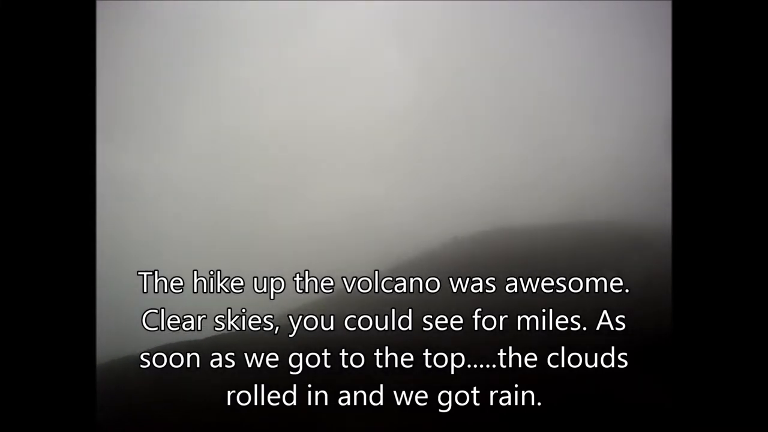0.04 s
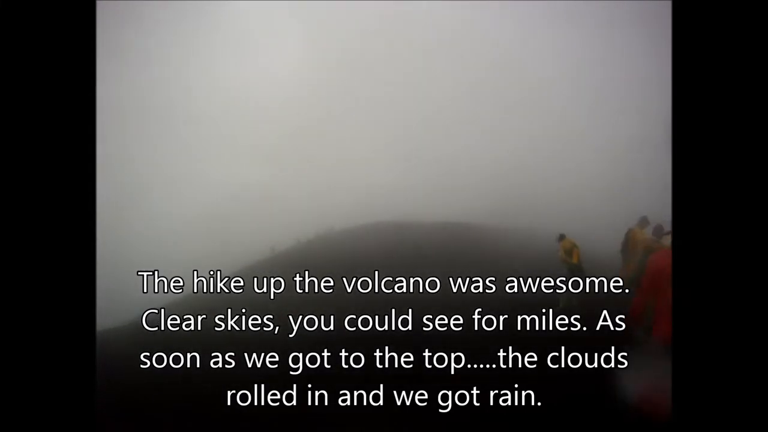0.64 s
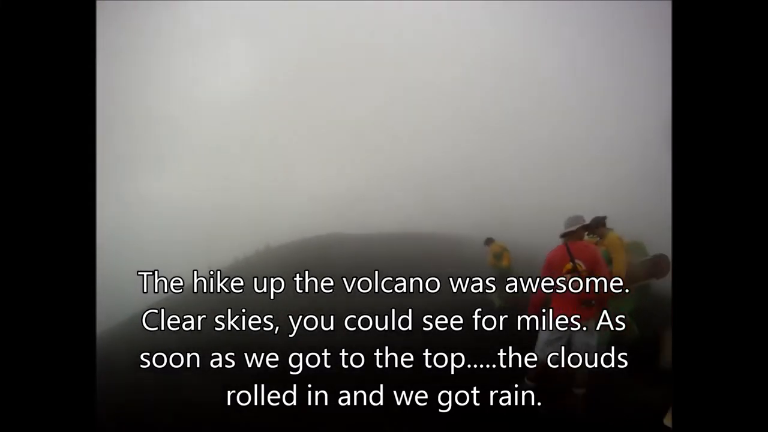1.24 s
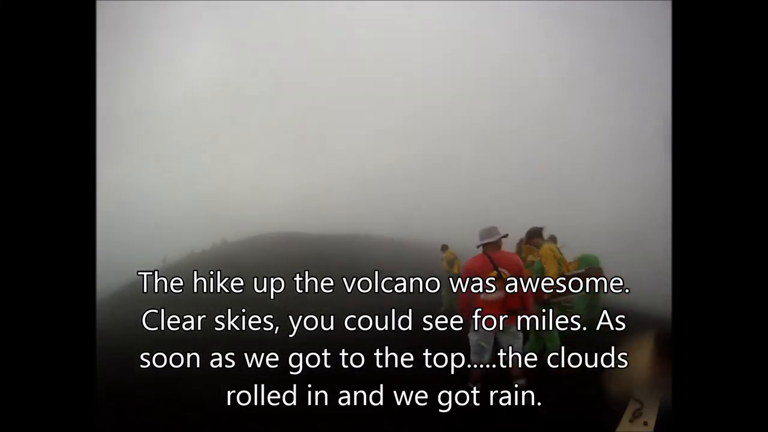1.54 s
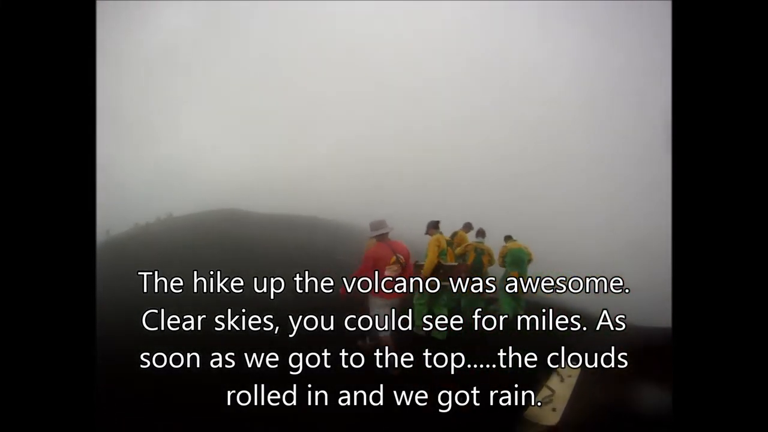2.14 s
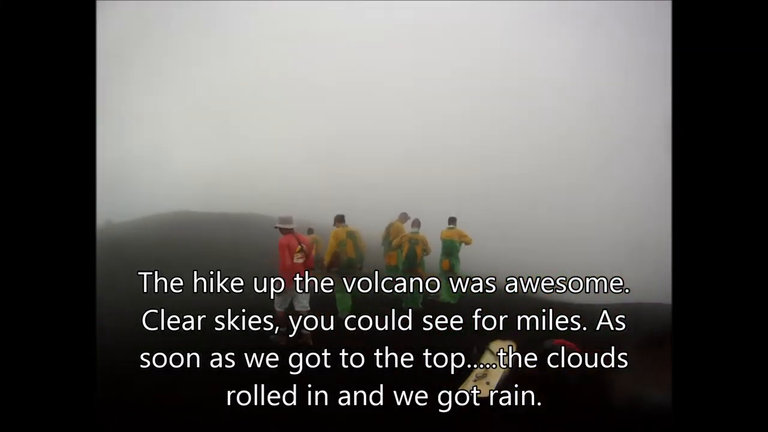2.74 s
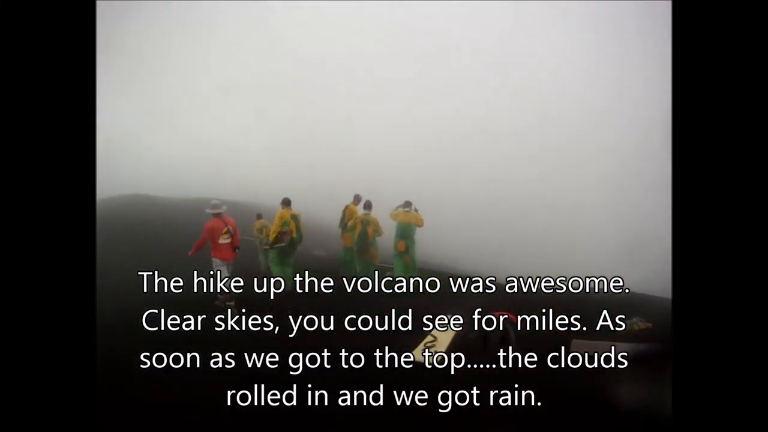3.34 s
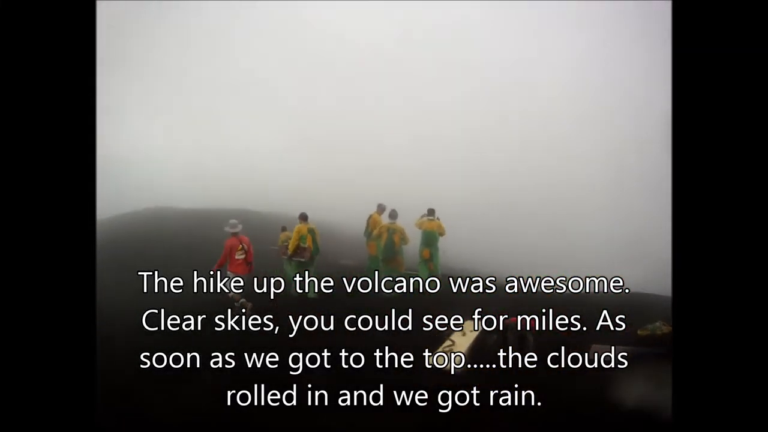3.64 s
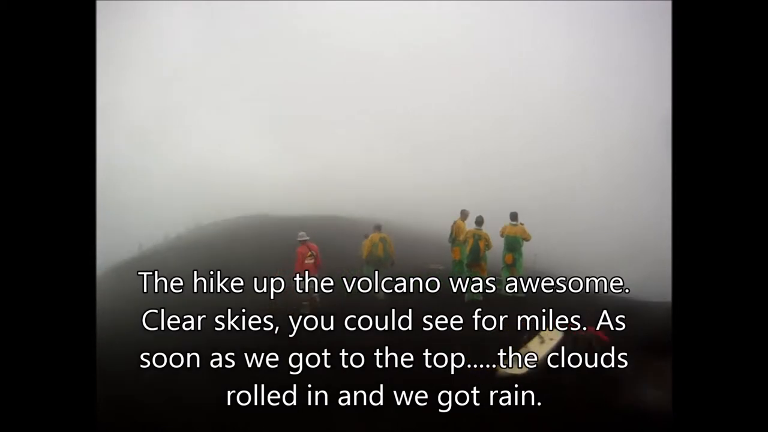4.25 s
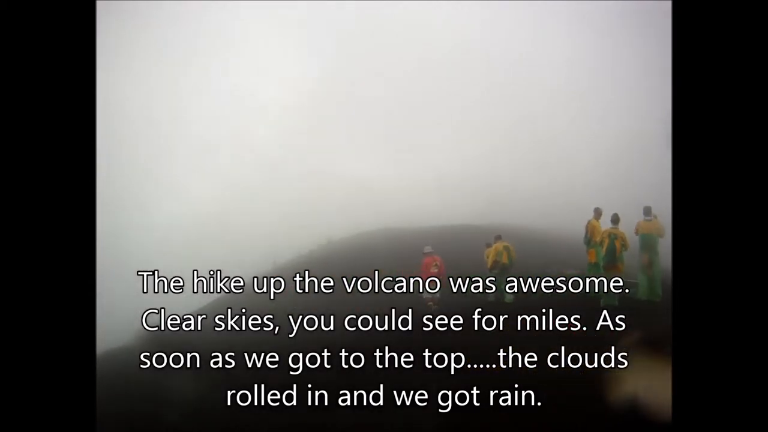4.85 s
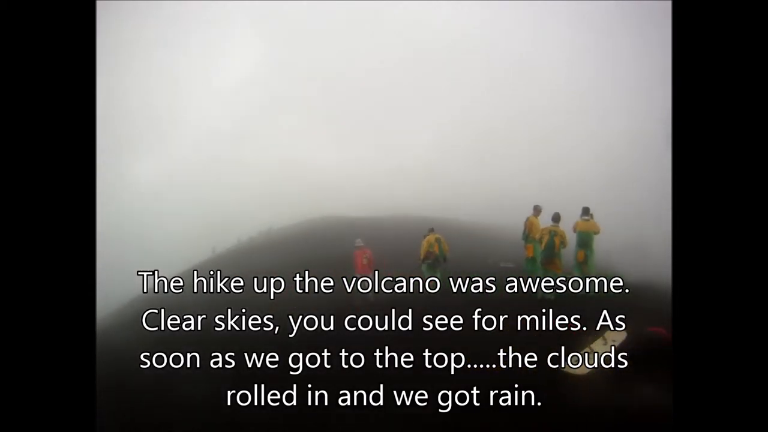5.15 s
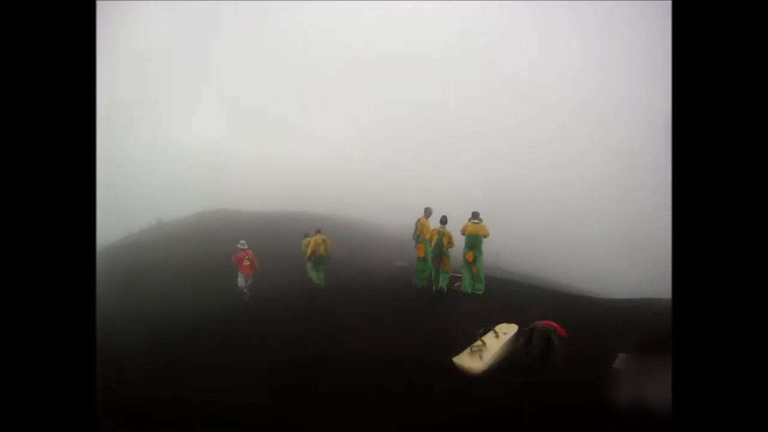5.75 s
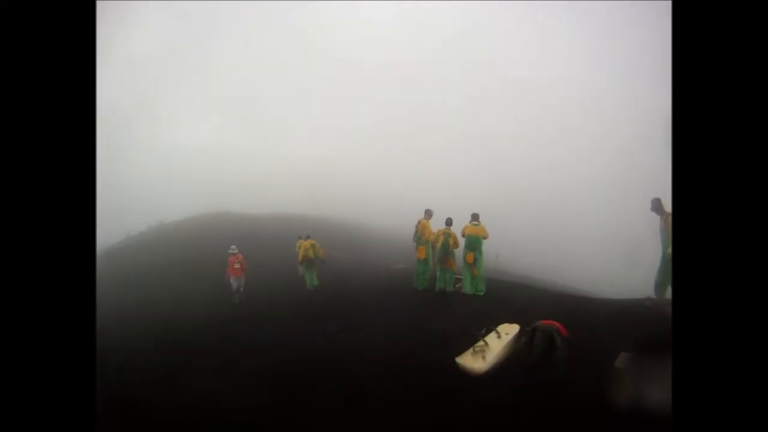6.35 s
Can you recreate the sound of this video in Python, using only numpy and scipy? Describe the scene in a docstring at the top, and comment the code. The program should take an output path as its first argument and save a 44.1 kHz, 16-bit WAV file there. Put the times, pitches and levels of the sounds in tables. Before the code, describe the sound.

Raindrops strike the plastic waterproof case of a small camera on an open hilltop, right at the microphone. Each makes a brief, sharp tick with a glassy edge, some loud and others dull and soft. The tapping is irregular throughout and thickest just past the middle. Beneath it, a quiet wet hiss, swishes of rain gear and light wind buffets come through the case.

```python
"""Raindrops tick against the plastic waterproof housing of a small camera on a bare, foggy hilltop.
Each drop rings the housing for a few milliseconds, sharpest right over the microphone. A wet hiss,
rustling rain gear and light buffets of wind come through the case. The camera samples slowly and
holds each value, which adds a glassy top."""
import sys
import numpy as np
from scipy import signal
from scipy.fft import rfft, irfft
from scipy.io import wavfile
from scipy.ndimage import uniform_filter1d, minimum_filter1d

SR = 44100
rng = np.random.default_rng(int(sys.argv[2]) if len(sys.argv) > 2 else 0)


def log_audio(samples):
    """Write samples as a 16-bit WAV file to the path given in sys.argv[1]."""
    # one column per channel
    frames = np.atleast_2d(samples).T
    # limit to full scale, then quantise
    limited = np.clip(frames, -1, 1)
    pcm = np.round(limited * 32767).astype(np.int16)
    wavfile.write(sys.argv[1], SR, pcm)


N = 291367

# Housing modes. Each row: frequency in Hz, level in dB, T60 in seconds.
HOUSING_MODES = [(1140, -19, 0.018), (1726, -12, 0.017), (2020, -15, 0.021), (2154, -2.5, 0.013),
                 (2414, -13.5, 0.022), (2660, -13, 0.018), (3016, 4, .015), (3390, -0.5, 0.013),
                 (3637, -3.5, 0.013), (3850, -1.5, 0.0085), (4555, -14, 0.0066), (5004, -17.5, 0.012),
                 (5467, -16.5, 0.01)]


def drop(db, tick_db, snap_db, spot_hz, aim, weight, spot_gain=1.21):
    """One drop rings the housing: modes in step over the microphone (aim 1), out of step elsewhere."""
    tick_from_hz, snap_from_hz, centre_hz = 2800, 4150, 3030
    build_s, spot_t60_s = 0.00017, 0.0082
    t = np.arange(1200) / SR
    hz, mode_db, t60_s = np.transpose(HOUSING_MODES)
    miss = (1 - np.clip(aim, 0, 1)) ** 2
    scatter, phase, detune = miss * rng.standard_normal((3, len(hz)))
    fat_db = 8 * weight * np.log2(np.maximum(2000 / hz, 1))  # fat drops favour the lowest modes
    centre_db = -7 * miss * (np.abs(hz - centre_hz) < 140)  # strongest over the microphone
    gain = undb(mode_db + fat_db + centre_db + 4 * scatter)
    detuned_hz = hz * (1 + 0.024 * detune)
    swing = np.cos(2 * np.pi * detuned_hz[:, None] * t + 0.79 * np.pi * phase[:, None])
    build = 1 - miss * np.exp(-t / build_s)  # a farther hit takes a moment to build
    modes = gain[:, None] * np.exp(-np.log(1000) * t / t60_s[:, None]) * swing * build
    # The wet patch under the drop rings at its own pitch.
    spot = build * np.exp(-np.log(1000) * t / spot_t60_s) * np.sin(2 * np.pi * spot_hz * t)
    knock = unit(unit(modes[hz < tick_from_hz].sum(0)) + spot_gain * miss * unit(spot))
    tick = unit(modes[(hz >= tick_from_hz) & (hz < snap_from_hz)].sum(0))
    snap = unit(modes[hz >= snap_from_hz].sum(0))
    # The stiff wall passes little bass, more under a fat drop.
    wall = signal.butter(4, 1400 * 2 ** (-0.8 * weight), "high", fs=SR, output="sos")
    ring = signal.sosfilt(wall, knock + undb(tick_db) * tick + undb(snap_db) * snap)
    return unit(ring) * undb(db) * np.sqrt(SR / 200)  # db is the level over 5 ms


# Distinct drops. Each row: start in seconds, level in dB, mid tick and high snap in dB against the
# low knock (all before trims), pitch of the struck spot in Hz, weight 0-1 (1 is a fat, slow drop).
BIG_DROPS = [(0.1276, -34.5, -8, -11, 2120, 0.85), (0.1404, -35.0, -6, -9, 2050, 0.4),
             (0.1708, -41, 5, 2, 2040, 0.9), (0.3472, -16.5, 9, 4, 2140, 0),
             (0.407, -37.5, -7, -6.5, 2240, 0.1), (0.4594, -37.0, -6, -11, 2100, 0.089),
             (0.4845, -32.5, -18, -17, 1860, 0.34), (0.5446, -26, 1.5, -9.5, 2200, 0.59),
             (0.6552, -26.5, -2.5, -4, 2120, 0.075), (0.7133, -32, 9, 3, 2140, 0.0),
             (0.752, -36.0, -10, -12, 2240, 0.97), (0.8429, -41.5, 4, -7, 2370, 0.7),
             (0.8776, -28, 0.5, -2, 2130, 0.49), (0.9826, -26.5, -11, -27, 2100, 0.0),
             (0.9938, -35.5, -26, -35, 1790, 0.5), (1.026, -13.0, 5, -3, 2130, 0.0),
             (1.1321, -25.5, -15, -33, 2040, 0.55), (1.1428, -40.5, -6, -21, 2350, 0.8),
             (1.2078, -40, -13, -30, 1950, 0.5), (1.2228, -32.5, 5.5, -17, 2180, 0.5),
             (1.3129, -29.0, 0, -3, 2100, 0.32), (1.324, -34, -22, -29, 1780, 0.61),
             (1.396, -39.5, 2, -21, 1590, 1.0), (1.4112, -41, -3, -15, 2280, 0.5),
             (1.4761, -28, -11, -14, 2000, 1), (1.6219, -36.5, -20, -30, 1780, 1.0),
             (1.6414, -25.0, 1.5, -4, 2060, 0.53), (1.7358, -25.5, -16, -18.5, 1870, 0.5),
             (1.7676, -40, -4, -5, 2210, 0.6), (1.9174, -36.5, 0, -2, 2170, 0.6),
             (1.9711, -15.0, 2, -10, 2080, 0.0), (2.026, -38.5, 1, -15, 2020, 0.82),
             (2.1825, -36, -2, -12.5, 2240, 0.17), (2.2822, -41.5, -12, -23, 1910, 0.4),
             (2.2898, -33.5, -1, -11, 2200, 0.1), (2.2974, -32.5, 1, -16, 2260, 0.63),
             (2.3128, -36.5, -1, -8, 2110, 0.44), (2.5201, -30, -25, -32, 1860, 1),
             (2.646, -39, -10, -14, 2300, 0.39), (2.809, -39.5, -25, -34, 1890, 0.3),
             (2.9059, -30.5, -4, -2.5, 2090, 0.4), (2.9646, -32, 2.5, -1.5, 2180, 0.66),
             (3.1325, -32.5, -7, -12, 2200, 0.5), (3.1373, -26, -3.5, -15, 2080, 0.52),
             (3.1862, -19.0, 3.5, 1, 2060, 0.31), (3.2021, -30, -1, -4, 2130, 0.34),
             (3.2106, -41.0, -13, -16, 1730, 0.7), (3.2215, -31, -6, -35, 2110, 0.5),
             (3.3235, -35, 2, -9.5, 2160, 0.7), (3.3483, -28.5, -3, -14.5, 2210, 0.2),
             (3.388, -30.5, -1.5, -10.5, 2160, 0.3), (3.4318, -34.0, -17, -40, 1730, 0.6),
             (3.4445, -32, -2, -15, 1380, 1.0), (3.4701, -29.5, -19, -32, 2070, 0.7),
             (3.4854, -36, -7, -21, 2290, 0.6), (3.5091, -31.5, 1, -18, 1830, 0.9),
             (3.5168, -27, 5.5, -19, 1490, 0.9), (3.5419, -36, -3, -4, 2010, 0.81),
             (3.5654, -35.5, -31, -39, 2120, 0.0), (3.5746, -40, -2, -6, 2190, 1.0),
             (3.6197, -17.5, 7, -1, 2180, 0.0), (3.6984, -31.0, 4, -4, 2130, 0.2),
             (3.742, -23.5, 1.5, -6, 2110, 0.2), (3.7785, -37, -6, -11, 1860, 1),
             (3.8503, -22.0, 3, -7.5, 2070, 0.042), (3.871, -39.5, -3, -10, 2220, 0.4),
             (3.919, -39.0, -20, -35, 1890, 0.4), (3.9304, -40, -4, -19, 2280, 0.3),
             (3.9489, -18.0, 5, -14, 2480, 0.3), (3.964, -32, -3, -6, 2120, 0.12),
             (3.9937, -33, -7, -18, 2300, 0.24), (4.0306, -36.5, -6, -3, 2130, 0.39),
             (4.0504, -38, -22, -32, 1730, 0.6), (4.0754, -38.5, -20, -31, 2000, 0.61),
             (4.0886, -28, 2.5, -7, 2140, 0.0), (4.1953, -37, -12, -6.5, 2180, 0.8),
             (4.202, -28.5, -30, -31, 2030, 0.38), (4.2952, -37.5, -13, -27, 1840, 1.0),
             (4.3057, -39.5, -7, -12, 2040, 0.51), (4.3221, -26.5, -1.5, -13, 2380, 0.36),
             (4.5002, -38.5, -22, -32, 2190, 0.95), (4.5689, -25.5, -8, -3, 2140, 0.4),
             (4.612, -23.5, -2, -4, 2140, 0), (4.6657, -20.5, 7, -1, 2170, 0.054),
             (4.8667, -33.5, -3.5, 0.5, 2080, 0.6), (4.8907, -36.5, -11, -11, 2250, 0.72),
             (4.961, -40, -27, -36, 2100, 0.38), (5.0352, -33.5, 1.5, -2, 2150, 0.37),
             (5.3015, -29.0, 2, 0, 2160, 0.0), (5.4011, -37, -19, -31, 2090, 1.0),
             (5.5352, -30.0, -8.5, -3, 2090, 0.3), (5.6259, -38.5, -5, -15, 1900, 0.9),
             (5.8053, -42, 2, -5.5, 2180, 0.65), (5.888, -22, 5, -5, 2180, 0.0),
             (5.9406, -36, -17, -21, 1820, 0.0015), (6.0153, -31.5, -3, -5, 2090, 0.025),
             (6.0726, -28, -6.5, -2.5, 2060, 0.15), (6.1025, -38, -4, -16, 2230, 0.01),
             (6.1631, -33.0, -0.5, -4.5, 2070, 0.4), (6.2607, -34.0, -4.5, -14, 2170, 0.0),
             (6.3408, -32.5, -6, -12, 2210, 0.5), (6.4403, -40.5, -11, -17, 2040, 0.62),
             (6.4813, -42.5, 3.5, -7, 2120, 1.0), (6.5175, -33.5, -5, -6, 2180, 0.85),
             (6.5633, -24.5, 5.5, -5.5, 2200, 0.09)]


def big_drops(trim_db=0.65, snap_trim_db=0.3, burst_db=-17, spray_db=-34, flight_s=0.07):
    """Single drops strike the case; the hardest burst, and their spray falls back on it."""
    out = np.zeros(N)
    for start_s, db, tick_db, snap_db, spot_hz, weight in BIG_DROPS:
        # Brighter and louder means closer to the microphone.
        aim = 0.31 + 0.02 * (tick_db + snap_db) / 2 + 0.011 * (db + 27.5)
        add(out, start_s, drop(db + trim_db, tick_db, snap_db + snap_trim_db, spot_hz, aim, weight))
        if db > burst_db:
            for delay_s in flight_s * rng.uniform(0.2, 1, 6):
                spray = drop(db + spray_db, tick_db, snap_db, spot_hz, aim=0, weight=weight)
                add(out, start_s + delay_s, spray)
    return out


def droplets(count=110, loudest_db=-42.5, range_db=8, tick_db=-12, snap_db=-21):
    """Fine droplets patter on the housing: mostly dull plops, more soft ones than loud."""
    out = np.zeros(N)
    for when, weight, softness in rng.random((count, 3)):
        brightness, pitch = rng.standard_normal(2)
        db = loudest_db - range_db * np.sqrt(softness)
        bright_db = 6 * brightness
        spot_hz = 1920 * np.exp(0.12 * pitch)
        plop = drop(db, tick_db + bright_db, snap_db + bright_db, spot_hz,
                    aim=0, weight=weight / 2, spot_gain=4.4)
        add(out, when * N / SR, plop)
    return out


# Hiss spectrum. Each row: frequency in Hz, relative density in dB.
HISS_SPECTRUM = [(500, -5.5), (900, -5.5), (1130, 2), (1450, -1), (1700, 0.5), (2150, -0.5), (2500, -14),
                 (3200, -6.5), (3650, -11.5), (4200, -17), (5200, -17.5), (5900, -28)]
# Strength of the rain all around. Each row: time in seconds, level in dB.
HISS_LEVELS = [(0.0, -54.5), (1.01, -56), (1.78, -51), (3.14, -55), (3.55, -53), (3.67, -54.5), (6.49, -54),
               (6.6, -57.5)]


def rain_hiss():
    """Countless far splashes merge into a smooth hiss."""
    time_s, db = np.transpose(HISS_LEVELS)
    level_db = np.interp(np.arange(N) / SR, time_s, db)
    return colour(rng.standard_normal(N), HISS_SPECTRUM) * undb(level_db)


# Rustle spectrum. Each row: frequency in Hz, relative density in dB.
RUSTLE_SPECTRUM = [(1500, -20), (2120, 3), (2380, 3.5), (2830, -2), (3200, -10), (3650, -1.5), (4200, -18),
                   (5200, -10), (5900, -23.5)]
# Swishes of rain gear. Each row: peak time in seconds, length in seconds, level in dB.
GEAR_SWISHES = [(.38, 0.17, -58.5), (1.3, 0.25, -53.5), (1.67, 0.39, -53), (1.88, 0.24, -45.5),
                (2.28, 0.3, -54.5), (2.65, 0.29, -51.5), (2.89, .14, -55), (3.4, 0.22, -59),
                (4.05, 0.14, -52.5), (4.33, 0.6, -55), (4.65, 0.22, -52.5), (4.98, 0.38, -56.5),
                (5.36, 0.25, -49.5)]


def gear_rustle(rest_db=-61.5, flicker_db=1):
    """Wet rain gear rustles in grainy swells and is never quite still."""
    creases = rng.standard_normal(N) * np.exp(0.15 * rng.standard_normal(N))
    level_db = swells(GEAR_SWISHES, rest_db, rise_share=0.54) + flicker_db * wander(rate_hz=24.89)
    return colour(creases, RUSTLE_SPECTRUM) * undb(level_db)


# Wind spectra. Each row: frequency in Hz, relative density in dB.
BUFFET_SPECTRUM = [(12, -9), (30, -3), (70, 2), (100, -0.5), (160, -4.5)]
MURMUR_SPECTRUM = [(70, -24), (105, -5), (140, 0), (200, -4), (290, -6), (390, -5), (500, -10),
                   (750, -11.5), (1200, -23.5), (2500, -56)]
# Gusts on the case. Each row: peak time in seconds, length in seconds, level in dB before trim.
WIND_GUSTS = [(.16, .12, -56.5), (.44, 0.16, -60), (.68, 0.06, -50), (.96, 0.16, -57), (1.2, 0.085, -54),
              (2.16, 0.054, -58), (2.74, 0.085, -55), (3.68, .2, -53.5), (3.9, .08, -54),
              (4.41, 0.088, -54.5), (5.5, 0.066, -59), (5.64, .11, -51.5), (5.84, .08, -53),
              (6.24, 0.075, -54.5), (6.48, 0.087, -51.5)]


def wind(breeze_db=-60.5, buffet_trim_db=-1.2, murmur_db=-55.5, flutter_db=1.5):
    """Gusts buffet the case and lift a low murmur of air a little; both flutter together."""
    gust_db = swells(WIND_GUSTS, breeze_db, rise_share=0.53)
    lift_db = 0.28 * (gust_db - breeze_db)
    buffets = colour(rng.standard_normal(N), BUFFET_SPECTRUM) * undb(gust_db + buffet_trim_db)
    murmur = colour(rng.standard_normal(N), MURMUR_SPECTRUM) * undb(murmur_db + lift_db)
    return (buffets + murmur) * undb(flutter_db * wander(rate_hz=20))


def undb(db):
    """Decibels to gain."""
    return 10 ** (np.asarray(db) / 20)


def unit(x):
    """Scale to unit energy."""
    return x / np.sqrt(np.sum(x ** 2))


def add(out, start_s, sound):
    """Mix a sound in at start_s."""
    start = int(np.clip(start_s * SR, 0, N - 1))
    out[start:start + len(sound)] += sound[:N - start]


def wander(rate_hz):
    """Random steps, smoothed twice; spread near 1."""
    hold = int(SR / rate_hz)
    steps = np.repeat(rng.standard_normal(N // hold + 1), hold)
    return uniform_filter1d(uniform_filter1d(steps, hold), hold)[:N] * np.sqrt(2)


def colour(x, spectrum):
    """Shape a signal by (Hz, dB) points; unit rms."""
    hz, db = np.transpose(spectrum)
    bins_hz = np.maximum(np.fft.rfftfreq(N, 1 / SR), 1)
    gain_db = np.interp(np.log(bins_hz), np.log(hz), db, left=-60, right=-60)
    return unit(irfft(rfft(x) * undb(gain_db), N)) * np.sqrt(N)


def swells(table, rest_db, rise_share):
    """Level in dB of bell-shaped swells over a floor; each rises for rise_share of its length."""
    t = np.arange(N) / SR
    power = undb(rest_db) ** 2
    for peak_s, length_s, db in table:
        width_s = length_s * np.where(t < peak_s, rise_share, 1 - rise_share)
        power = power + undb(db) ** 2 * np.exp(-((t - peak_s) / width_s) ** 2)
    return 10 * np.log10(power)


def scene():
    """Drops on the case over hiss, rustle and wind, in mono."""
    background = rain_hiss() + gear_rustle() + wind()
    return (background + droplets() + big_drops())[None]


def record(dry, sampler_hz=12000, noise_db=-75, ceiling=0.82, top_hz=15250):
    """The camera samples slowly, adds faint noise, limits peaks and holds each value."""
    anti_alias = signal.ellip(6, 0.3, 60, 5950, fs=SR, output="sos")
    slow = signal.resample_poly(signal.sosfilt(anti_alias, dry), sampler_hz, SR, axis=1)
    slow = slow + undb(noise_db) * rng.standard_normal(slow.shape)
    gain = ceiling / np.maximum(np.abs(slow), ceiling)
    limited = slow * uniform_filter1d(minimum_filter1d(gain, size=9), size=9)
    steps = np.repeat(limited, 8, axis=1)  # the hold mirrors the ticks into the treble
    held = signal.resample_poly(steps, SR, 8 * sampler_hz, axis=1)[:, :N]
    lowpass = signal.ellip(8, 0.2, 80, top_hz, fs=SR, output="sos")
    return signal.sosfilt(lowpass, held)


dry = scene()
out = record(dry)
log_audio(out)
```